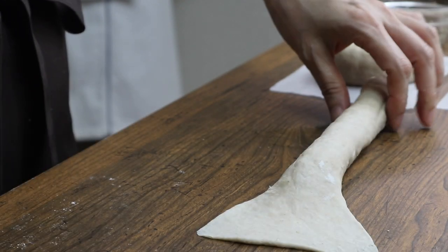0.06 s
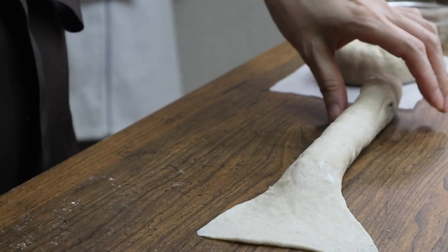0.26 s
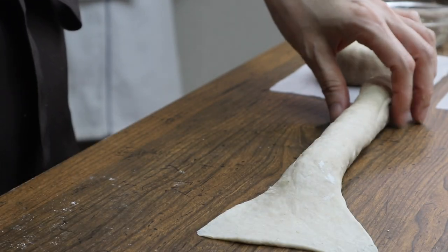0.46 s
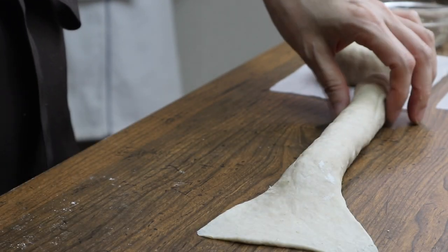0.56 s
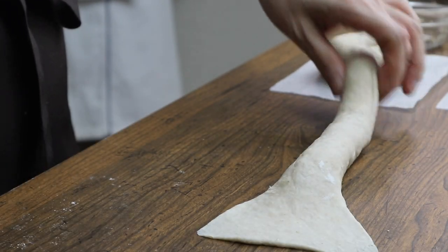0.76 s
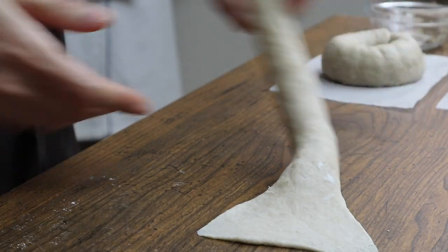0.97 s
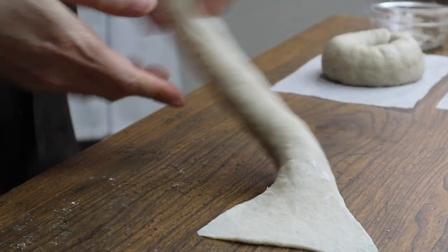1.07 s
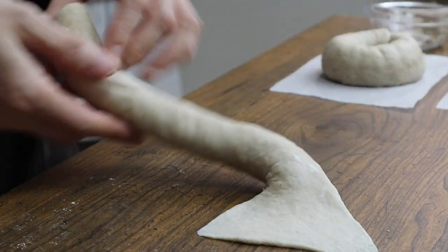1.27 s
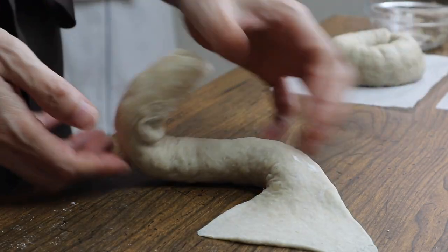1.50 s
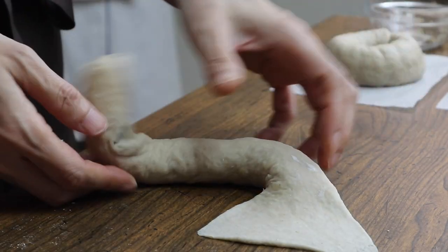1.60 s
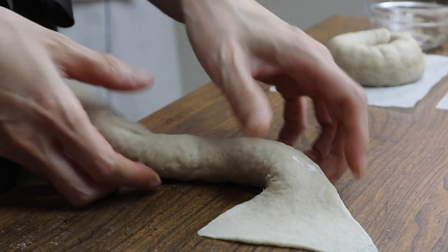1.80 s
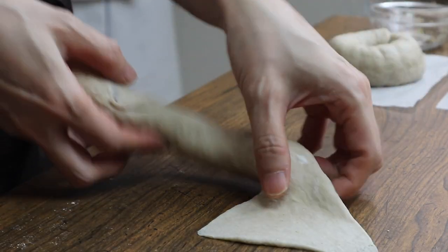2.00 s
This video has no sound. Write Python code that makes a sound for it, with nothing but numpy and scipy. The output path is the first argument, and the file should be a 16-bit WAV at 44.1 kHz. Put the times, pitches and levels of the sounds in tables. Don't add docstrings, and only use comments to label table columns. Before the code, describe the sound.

One loud knock of wood against a wooden table, followed by quiet dough handling over fridge hum

```python
import sys
import numpy as np
from scipy import signal
from scipy.fft import rfft, irfft
from scipy.io import wavfile
from scipy.ndimage import uniform_filter1d

SR = 44100
rng = np.random.default_rng(int(sys.argv[2]) if len(sys.argv) > 2 else 0)


def gain_from_decibels(decibels):
    exponent = np.asarray(decibels, float) / 20
    return 10 ** exponent


def wav_out(sig):
    wavfile.write(sys.argv[1], SR, np.round(np.clip(np.atleast_2d(sig).T, -1, 1) * 32767).astype(np.int16))


N = 90404

# pitch in Hz, level in dB per Hz.
AIR_CENTRE = [(70, -12), (130, 2.5), (300, 1.5), (1000, -8), (2300, -12.5), (3600, -21.5), (10000, -34.5),
              (14000, -33.5)]
# pitch in Hz, level in dB per Hz.
AIR_WIDTH = [(70, -12), (150, 4.5), (500, 4.5), (1200, 1), (3000, -4), (6000, -11), (11000, -20.5),
             (15000, -30)]
# multiple of the shaft rate, level in dB.
COMPRESSOR_HUM = [(1, -49), (2, -61.5), (3, -60), (6, -55.5), (9, -60), (13, -68.5), (14, -61), (16, -78),
                  (21, -61.5), (22, -85)]
# middle in seconds, length in seconds, level in dB, resonance in Hz, treble in dB.
HAND_BRUSHES = [
    (0.394, 0.017, -52.5, 2000, -20),
    (0.528, 0.032, -57, 3200, -16),
    (0.786, 0.068, -48.5, 2040, -15),
    (0.795, .07, -60.5, 3270, -14),
    (.97, .03, -61, 2000, -13),
    (1.412, 0.11, -69, 3130, 2),
    (1.655, 0.092, -57, 2360, -7),
    (1.747, 0.028, -45, 2050, -26),
    (1.774, .04, -62.5, 3300, -3),
    (1.955, 0.057, -59, 3430, -34),
]
# start in seconds, level in dB, pitch in Hz,
# length in cycles with the sign of the push, room and ring in dB.
TABLE_TAPS = [
    (.1125, -24, 1050, -.72, -4),
    (.2387, -2.5, 700, .6, 0),
    (.4824, -29, 500, -.5, -8),
    (.4872, -31, 1250, -.8, -4),
    (1.7425, -38, 2300, .8, -8),
    (1.7520, -34, 900, .9, -6),
    (1.7545, -40, 3000, .7, -8),
    (1.8870, -33, 1050, -.8, -8),
    (1.9712, -26, 800, -.55, -10),
    (1.9729, -30, 250, .5, -10),
]
# pitch in Hz, level in dB, time to fall 60 dB in seconds.
TABLE_RINGS = [(107.2, -42, 0.3), (151, -24, 0.098), (294, -24.5, 0.28), (1890, -17.5, 0.041),
               (2080, -27, 0.071), (2244, -29.5, 0.058), (3050, -36, .02)]
# delay in seconds, signed gain, pitch ratio,
# smear in seconds, lag between the microphones in seconds.
WALL_ECHOES = [(0, 1, 1, 0, .00002), (.0043, .26, 1.17, .0018, -.00002), (.0120, -.29, 1.28, .0007, .00001),
               (.0196, -.08, 1.25, .001, .00002), (.0269, .5, .9, -.0001, .00002),
               (.0363, -.2, .85, .0006, .00001), (.0400, -.08, .5, .0006, 0),
               (.0475, .13, 1.2, .0002, .00003), (.0568, -.12, 1.25, .0016, -.00002),
               (.0865, .06, 1.1, .001, .00002), (.1120, .04, 1.3, .001, -.00002)]
# pitch in Hz, level in dB, time to fall 60 dB in seconds, side level in dB.
ROOM_TAIL = [(122, -25.5, 0.27, -39), (270, -26, .35, -32), (484, -22.5, 0.3, -30), (716, -23, 0.42, -25),
             (987, -24, .4, -14.5), (1290, -28.5, 0.38, -10.5), (1500, -34, 0.42, -7),
             (2000, -29, .33, -16), (2550, -33, 0.26, -2.5)]

LEFT_RIGHT = np.array([[1], [-1]])
AIR_CENTRE_DB, AIR_WIDTH_DB, AIR_FLICKER_DB, LOW_CUT_HZ = -46.5, -51, -0.5, 18
SHAFT_HZ, HUM_WOBBLE_DB, HUM_SIDE_DB = 49.04, 1.5, -20
CASE_HZ, CASE_WIDTH_HZ, CASE_DB = 207.3, 19.5, -51
BRUSH_WIDTH_HZ, BRUSH_GRAIN_DB, BRUSH_SIDE_DB = 320, 2.5, -6
HISS_HZ, HISS_WIDTH_HZ = 7100, 22000
RING_LEAD_S, RING_RISE_S = .00092, .0004
TAIL_RISE_S, TAIL_GRAIN_DB, TAIL_GRAIN_HZ, TAIL_TOP_HZ = .03, 1.5, 200, 2580
CENTRE_TOP_HZ = 12000


def level(x, db):
    return x * gain_from_decibels(db) / np.sqrt(np.mean(x ** 2))


def band(x, hz, width_hz):
    return signal.lfilter(*signal.iirpeak(hz, hz / width_hz, fs=SR), x)


def two_bands(x, hz, width_hz):
    return band(band(x, hz, width_hz), hz, width_hz)


def walk(rate_hz):
    hold = int(SR / rate_hz)
    steps = np.repeat(rng.standard_normal(N // hold + 1), hold)
    wander = uniform_filter1d(uniform_filter1d(steps, hold), hold)[:N]
    return wander / wander.std()


def coloured(points, db):
    hz = np.arange(N // 2 + 1) * SR / N + 1e-3
    point_hz, point_db = np.transpose(points)
    gain = gain_from_decibels(np.interp(np.log(hz), np.log(point_hz), point_db))
    gain = gain / (1 + (LOW_CUT_HZ / hz) ** 6)
    noise = 0
    for octave in range(5, 15):
        share = np.sqrt(np.clip(1 - abs(np.log2(hz) - octave), 0, 1))
        part = irfft(rfft(rng.standard_normal(N)) * gain * share, N)
        noise = noise + gain_from_decibels(AIR_FLICKER_DB * walk(4.55)) * part
    return level(noise, db)


def room_air():
    return coloured(AIR_CENTRE, AIR_CENTRE_DB) + coloured(AIR_WIDTH, AIR_WIDTH_DB) * LEFT_RIGHT


def fridge(t):
    turn = 2 * np.pi * SHAFT_HZ * t
    hum = 0
    for multiple, db in COMPRESSOR_HUM:
        wobble_db = min(multiple - 1, 1) * HUM_WOBBLE_DB * walk(4.08)
        tone = np.sin(multiple * turn + rng.uniform(0, 5.92))
        hum = hum + np.sqrt(2) * gain_from_decibels(db + wobble_db) * tone
    case = level(two_bands(rng.standard_normal(N), CASE_HZ, CASE_WIDTH_HZ), CASE_DB)
    side = gain_from_decibels(HUM_SIDE_DB) * np.gradient(hum) * 10
    return hum + case + side * LEFT_RIGHT


def brushes(t):
    out = 0
    for middle, length, db, hz, treble_db in HAND_BRUSHES:
        grit = rng.standard_normal((2, N)) * gain_from_decibels(BRUSH_GRAIN_DB * walk(150))
        body = level(band(grit, hz, BRUSH_WIDTH_HZ), 0)
        hiss = level(two_bands(grit, HISS_HZ, HISS_WIDTH_HZ), treble_db)
        mid, side = body + hiss
        swell = gain_from_decibels(db) * np.exp(-(2 * (t - middle) / length) ** 2)
        out = out + swell * (mid + gain_from_decibels(BRUSH_SIDE_DB) * side * LEFT_RIGHT)
    return out


def room_tail():
    age, tail = np.arange(SR // 2) / SR, 0
    for hz, db, t60, side_db in ROOM_TAIL:
        mid = two_bands(rng.standard_normal(len(age)), hz, hz * .5)
        side = two_bands(rng.standard_normal(len(age)), hz, hz * .5)
        fade = gain_from_decibels(db - 60 * age / t60) * (1 - np.exp(-age / TAIL_RISE_S)) / mid.std()
        tail = tail + fade * (mid + gain_from_decibels(side_db) * side * LEFT_RIGHT)
    tail = tail * gain_from_decibels(TAIL_GRAIN_DB * walk(TAIL_GRAIN_HZ)[:len(age)])
    return signal.sosfilt(signal.butter(6, TAIL_TOP_HZ, fs=SR, output="sos"), tail)


def push_and_echoes(since, db, hz, cycles, wet_db):
    out = 0
    for delay, echo, ratio, smear, lag in WALL_ECHOES:
        age = since - delay + lag * LEFT_RIGHT
        gain = np.sign(cycles) * echo * gain_from_decibels(db + wet_db * (delay > 0))
        swell = np.exp(-(age / (abs(cycles) / hz + smear)) ** 2)
        out = out + gain * np.cos(2 * np.pi * hz * ratio * age) * swell
    return out


def table_ring(since, db, cycles, wet_db):
    out = 0
    age = np.clip(since + RING_LEAD_S + WALL_ECHOES[0][4] * LEFT_RIGHT, 0, None)
    for hz, ring_db, t60 in TABLE_RINGS:
        ring = np.sin(2 * np.pi * hz * age) * np.tanh(age / RING_RISE_S)
        out = out - np.sign(cycles) * gain_from_decibels(db + wet_db + ring_db - 60 * age / t60) * ring
    return out


def taps(t):
    out, kicks = np.zeros((2, N)), np.zeros(N)
    for start, db, hz, cycles, wet_db in TABLE_TAPS:
        first = int(start * SR)
        span = slice(first - SR // 50, first + SR // 2)
        since = t[span] - start
        out[:, span] += push_and_echoes(since, db, hz, cycles, wet_db)
        out[:, span] += table_ring(since, db, cycles, wet_db)
        kicks[first] = gain_from_decibels(db + wet_db)
    return out + signal.fftconvolve(kicks[None], room_tail(), axes=1)[:, :N]


def scene():
    t = np.arange(N) / SR
    return room_air() + fridge(t) + brushes(t) + taps(t)


def roll_off(x):
    return signal.sosfilt(signal.butter(12, 15100, fs=SR, output="sos"), x)


def record(dry):
    mid = dry.mean(axis=0)
    dull = signal.sosfiltfilt(signal.butter(4, CENTRE_TOP_HZ, fs=SR, output="sos"), mid)
    return roll_off(dry - mid + dull)


dry = scene()
out = record(dry)
wav_out(out)
```